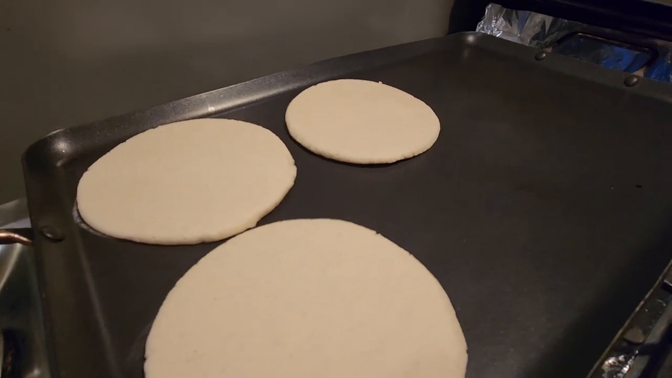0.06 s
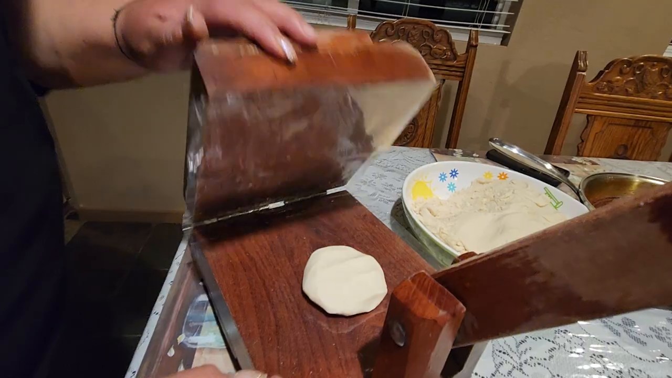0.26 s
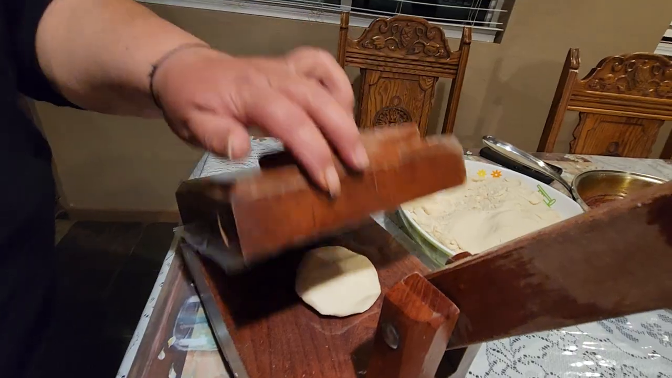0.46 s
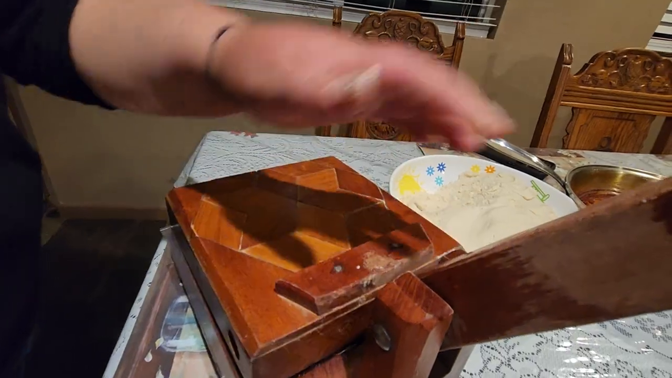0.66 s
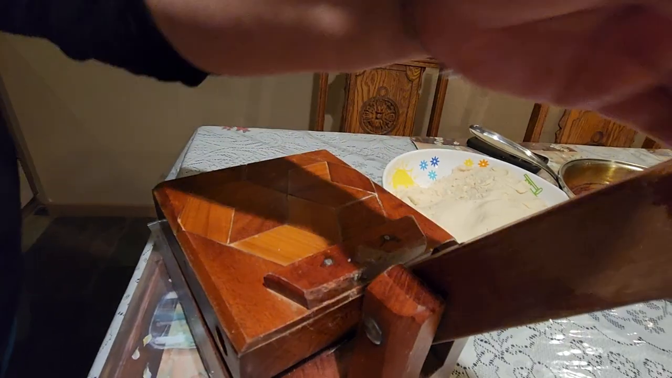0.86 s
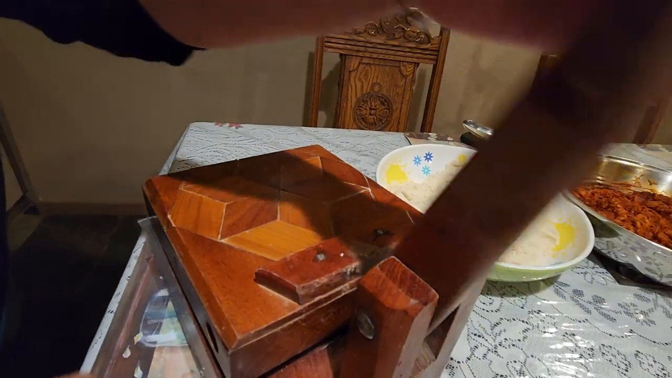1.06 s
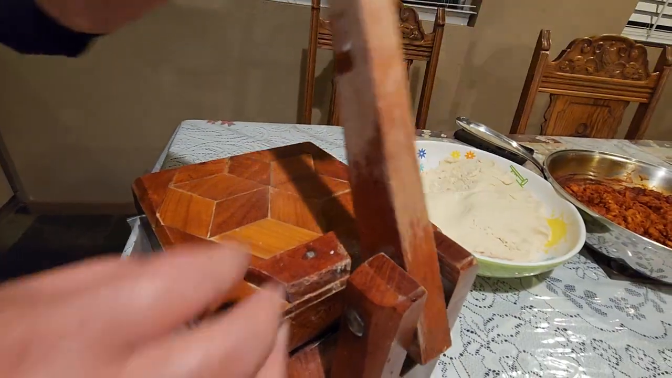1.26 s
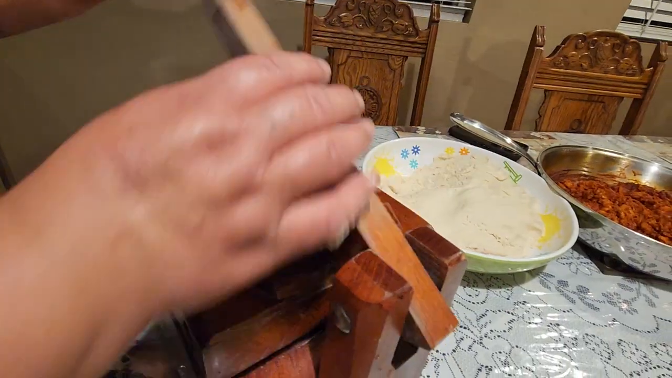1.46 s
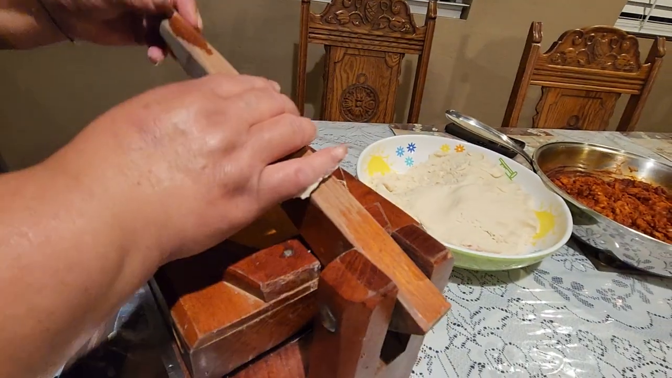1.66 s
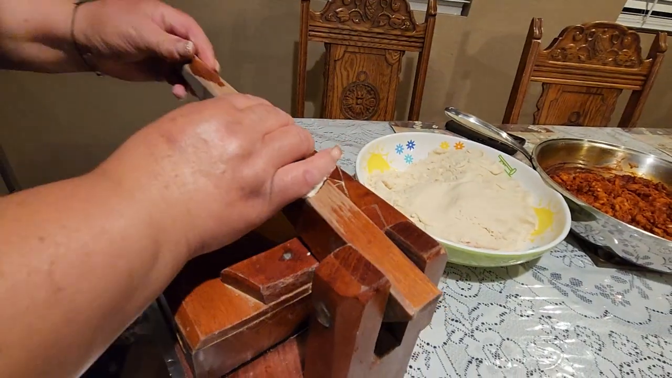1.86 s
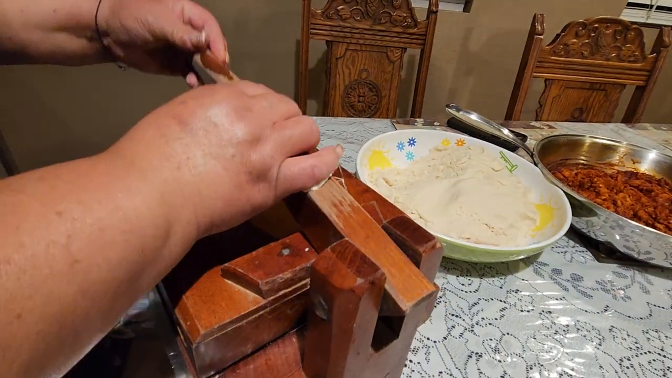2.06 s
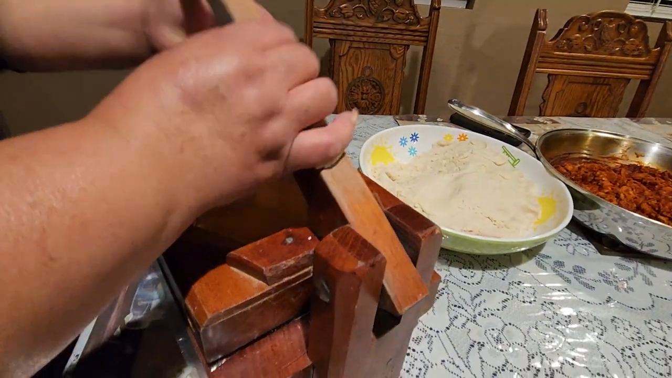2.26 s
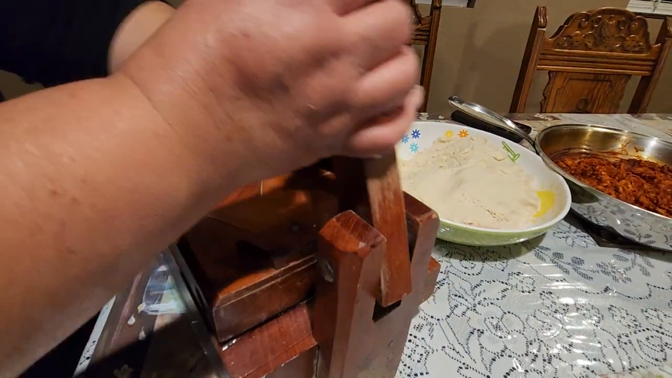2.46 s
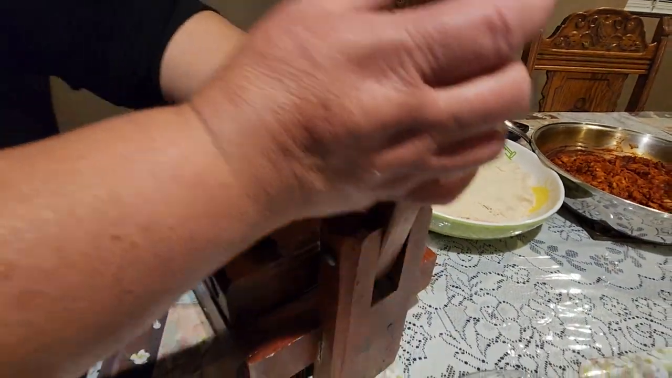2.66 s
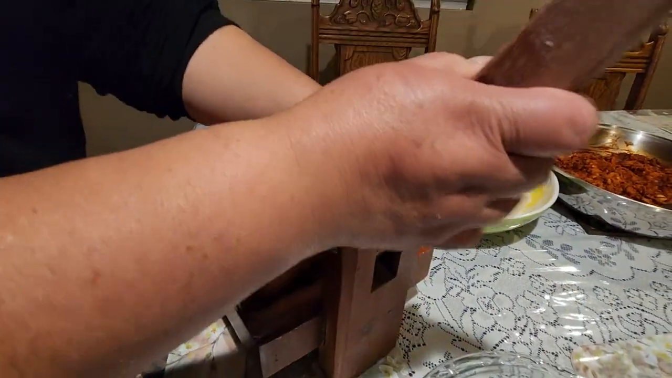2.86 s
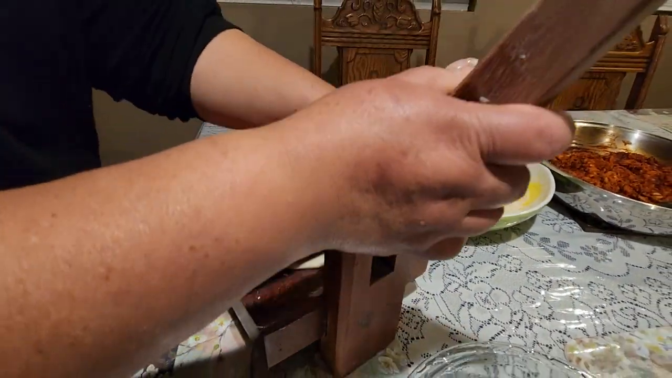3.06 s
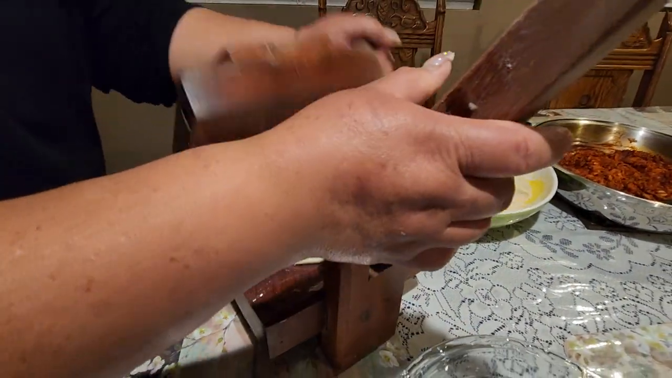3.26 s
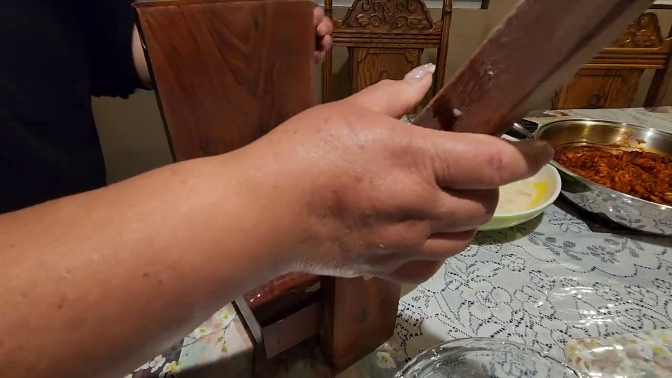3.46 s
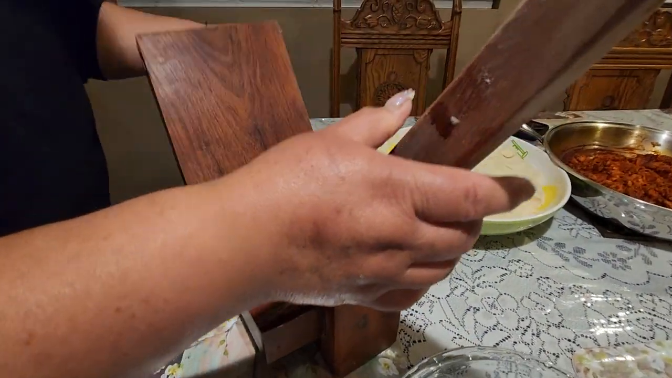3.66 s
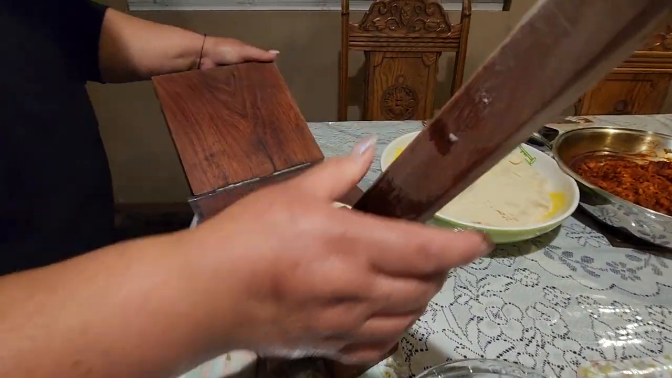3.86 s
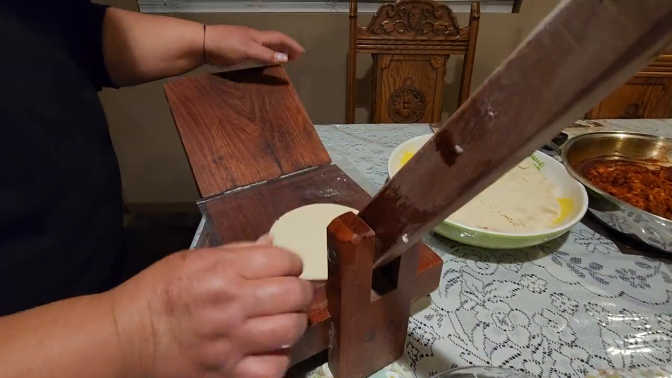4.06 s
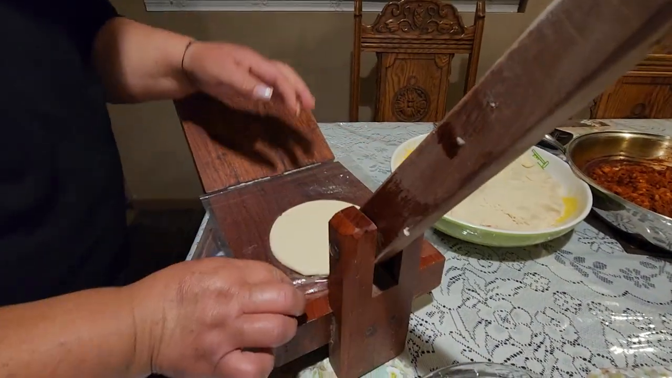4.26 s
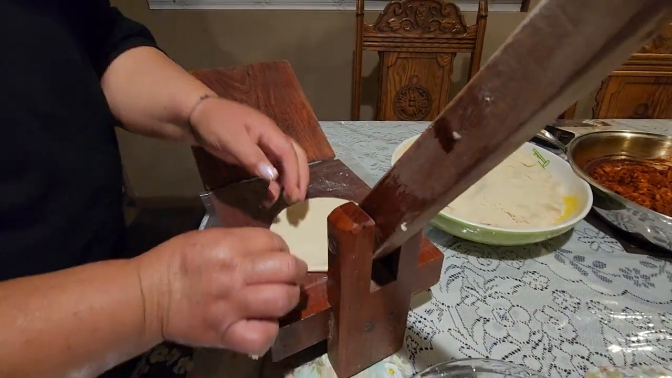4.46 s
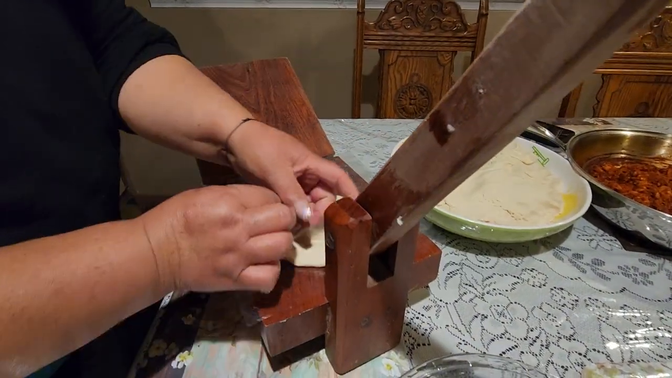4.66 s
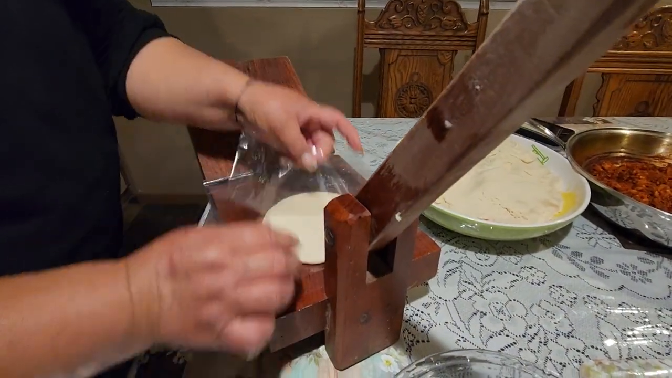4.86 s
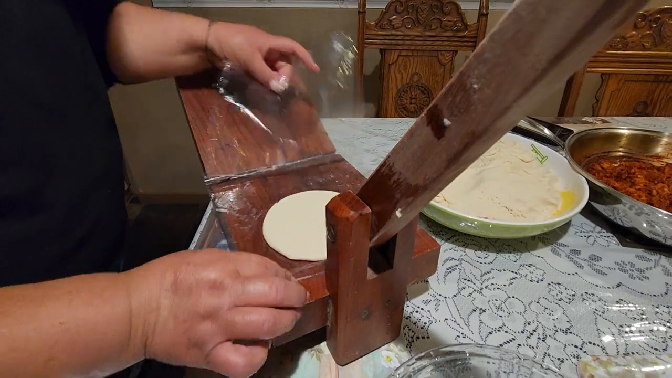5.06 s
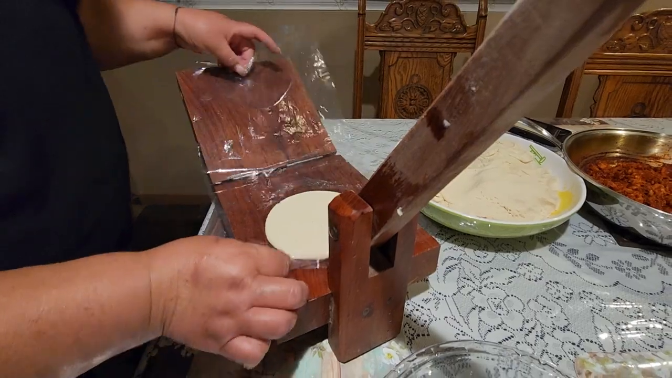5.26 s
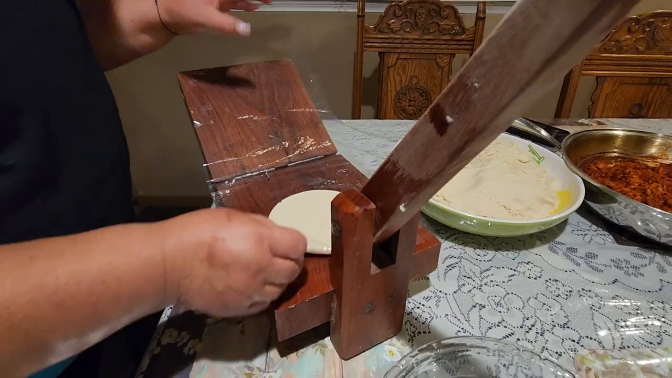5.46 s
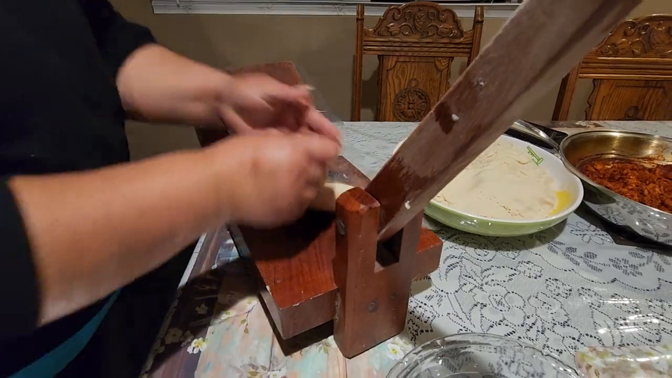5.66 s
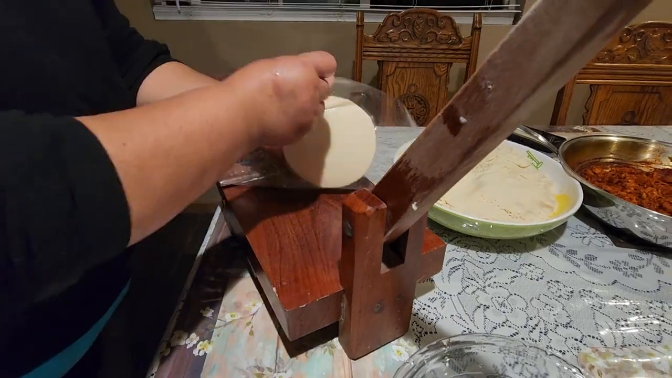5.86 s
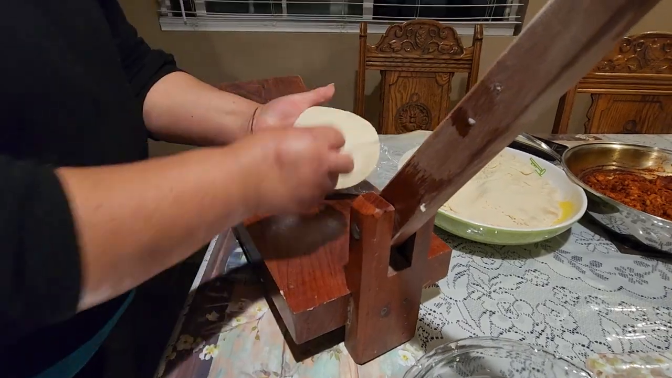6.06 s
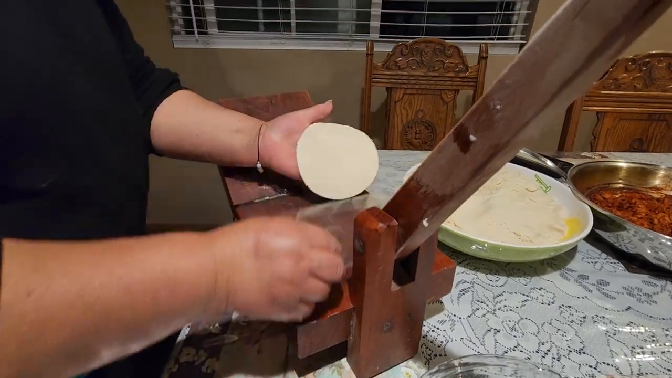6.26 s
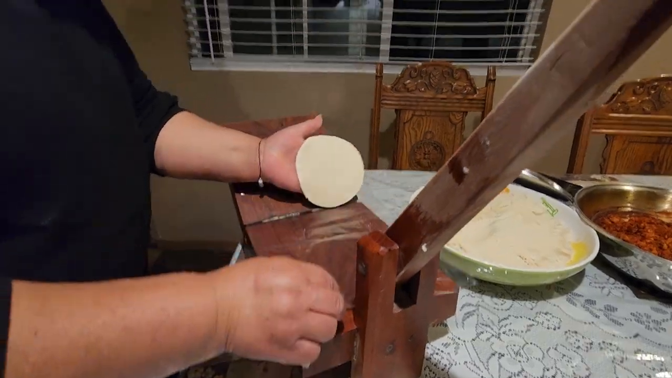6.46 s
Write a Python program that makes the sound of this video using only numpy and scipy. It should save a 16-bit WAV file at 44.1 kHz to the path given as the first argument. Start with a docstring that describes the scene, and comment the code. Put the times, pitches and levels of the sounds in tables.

```python
"""A wooden tortilla press on a cloth-covered table, heard close up in stereo: its blows are ringing modes with cracks.
The lid shuts, the loose lever knocks in its fork, a palm strokes it and the hinge squeaks as the lid falls open.
Then a thin plastic sheet is peeled off the dough: clumped clicks, dragging fingers and snapping folds.
A hot griddle, as shaped noise, hisses for the first 0.3 s; a quiet dining room and a motor hum lie below."""
import sys
import numpy as np
from scipy import signal
from scipy.fft import rfft, irfft, next_fast_len
from scipy.io import wavfile

SR = 44100
rng = np.random.default_rng(int(sys.argv[2]) if len(sys.argv) > 2 else 0)


def store_wav(level_fs):
    """Save 16-bit WAV to argv[1]."""
    pcm = np.round(np.clip(np.atleast_2d(level_fs), -1, 1) * 32767)
    wavfile.write(sys.argv[1], SR, pcm.T.astype(np.int16))


N = 286826

# Ringing modes of the lever: f/Hz, relative level/dB, free t60/s
LEVER_MODES = [(2039, 1, 0.15), (2256, -9.5, 0.22), (2510, -11, 0.15), (2740, -5, 0.14), (2793, -11, 0.25),
               (3024, -18.5, 0.11), (3055, -11.5, 0.29), (3575, -9.5, 0.084), (3540, 7, 0.07),
               (3803, -7, 0.24), (4165, -6, 0.06), (4614, -7, 0.097), (5480, -7, .06), (5574, -22.5, 0.25),
               (6720, -21.5, 0.065), (7530, -20.5, 0.034)]
# Ringing modes of the press body: f/Hz, relative level/dB, t60/s
PRESS_MODES = [(373.8, 1.5, 0.09), (551.5, -8, 0.078), (695.7, -11, 0.14), (802, 0.5, 0.048),
               (857, -6.5, 0.018), (1075, 1, 0.031), (1157, 0, 0.042), (1385, 2.5, 0.03),
               (1594, -10, 0.081), (1980, -7, 0.015)]
# Ringing modes of the table: f/Hz, relative level/dB, t60/s
TABLE_MODES = [(28.6, -7.5, 0.54), (37.2, -10, 0.28), (67, -2, 0.23), (84.5, -14.5, 0.23),
               (126.2, -1.5, 0.22), (149.1, -9, 0.32), (202, -14.5, 0.15), (275.8, -10, 0.36),
               (322, 3.5, 0.14)]
# Blows of lid, lever and table: t/s, lever low-mode level/dB, lever high-mode level/dB,
# share of free ring left by the grip/0-1, press level/dB, press favoured f/Hz, table level/dB,
# table favoured f/Hz, crack level/dB, dull shudder level/dB, bright shudder level/dB, left over right/dB
BLOWS = [(0.3027, -51, -43, 0.18, -58.5, 373, -44.5, 38, -52, -60, -63, 2),
         (0.5341, -47, -42.5, 0.16, -51, 1350, -67, 223, -37, -44.5, -46.5, 3.5),
         (0.5527, -56, -40.5, 0.03, -76.5, 390, -61, 270, -55, -60.5, -55.5, 10.5),
         (0.6012, -37.5, -21, 0.02, -35, 1100, -29, 46.2, -30.5, -36, -35.5, 6),
         (0.6148, -55, -41, 0.3, -46, 875, -24.5, 77.9, -44, -22, -39.5, 1),
         (0.627, -40, -38.5, 0.2, -28, 746, -14, 38.6, -44, -18.5, -38.5, -0.5),
         (0.9765, -34, -27, 0.34, -22, 1200, -33.5, 308.7, -33.5, -40, -43, 7),
         (.9839, -7, -11, 0.14, -25, 1180, -35, 124, -30, -40, -36.5, 2),
         (1.035, -18, -21.5, 0.05, -27, 902, -30, 118, -18.5, -48, -36.5, 5.5),
         (1.0476, -25.5, -34.5, 0.39, -34, 1174, -45, 128, -39.5, -42.5, -37, 4.5),
         (1.1462, -18, -20, 0.28, -24.5, 994, -30.5, 153.4, -35.5, -41, -60, 2.5),
         (1.1984, -43, -43, 0.05, -43, 1650, -41, 139.3, -54, -39.5, -47, 9),
         (1.2548, -24, -42.5, 0.26, -20.5, 964, -34.5, 124, -21.5, -49, -46.5, 0),
         (1.2772, -45.5, -53, .2, -38.5, 878, -42.5, 118, -38.5, -46, -45, -8.5),
         (1.519, -42, -29, .36, -28.5, 981, -34, 85, -45, -22, -28.5, 4.5),
         (1.5388, -53, -74, .16, -35.5, 650, -22, 62.5, -50, -43, -64, 6),
         (1.6378, -67, -55, .15, -47, 350, -33, 60.1, -56, -59, -70, 3),
         (2.0651, -26, -36.5, 0.11, -36.5, 1720, -37.5, 135, -72, -44, -35, 11.5),
         (2.15, -41, -45, 0.37, -34, 541, -40, 140.4, -42.5, -39, -43.5, 1.5),
         (2.358, -56, -51.5, 0.07, -62, 428, -53, 38.6, -39, -61, -56, 0),
         (2.5439, -55, -51, 0.3, -40.5, 377, -39.5, 151, -57, -35, -49.5, 4.5),
         (2.6002, -56, -59.5, 1, -44, 352, -32, 150, -57, -26, -51.5, 3.5),
         (2.648, -12.5, -16.5, 0.66, -27, 798, -27, 156.7, -37.5, -34, -30, 6),
         (2.777, -30, -37, 0.21, -35, 353, -34, 318, -60, -29.5, -30, 6),
         (2.7921, -25.5, -41, 0.17, -29, 1480, -27.5, 110, -58, -29, -53, 5.5),
         (2.8893, -34.5, -41.5, 0.1, -38.5, 1030, -28.5, 27, -48, -58, -43.5, 6),
         (3.57, -73, -46.5, 0.14, -76, 1440, -48.5, 31.8, -50, -74, -70, 0),
         (3.7335, -60, -37.5, .24, -43, 454, -46, 115, -41, -44, -55, -1),
         (3.8076, -41, -42, 0.04, -31, 467, -29, 142, -60, -21.5, -71, 0),
         (3.849, -48, -54, 0.08, -53, 390, -21.5, 43.5, -66, -66, -47.5, 0)]
# Palm strokes along the lever: start t/s, length t/s, wood whisper level/dB, skin hiss level/dB
PALM_STROKES = [(2.953, 0.38, -46, -80), (3.875, 0.31, -49, -63)]
# Stick-slip squeaks, the hinge and then a finger on the film, each a curve: t/s, f/Hz, level/dB
SQUEAKS = [
    [(3.545, 1300, -73), (3.57, 1456, -54), (3.6, 1396, -57), (3.62, 1385, -48.5), (3.645, 1270, -59.5),
     (3.69, 1360, -79)],
    [(5.19, 1213, -70), (5.21, 1213, -50.5), (5.23, 1170, -71), (5.3, 1222, -62), (5.32, 1210, -76)],
]
# Overtones of each squeak against its fundamental: second level/dB, third level/dB
SQUEAK_OVERTONES = [(0, -13), (-21, -19)]
# Rustles of the plastic lining, stirred by lid and lever, and shudder tails: t/s, crinkle level/dB,
# crinkle top level/dB, rough mid-range shudder tail after the blows level/dB, t60/s
STIRS = [(0.298, -77, -87, -68.5, 0.48), (.57, -64.5, -77, -82.5, 0.54), (.605, -54.5, -57, -81, 0.17),
         (0.628, -56.5, -72.5, -43, 0.38), (1.04, -64.5, -57, -58, 0.77), (1.17, -67, -63.5, -48, 0.45),
         (1.248, -47, -55, -62, 0.35), (1.3, -68, -64, -72, 0.14), (1.55, -72, -91, -71, 0.51),
         (2.359, -69, -76, -75.5, 0.75), (2.559, -63.5, -85, -64, 1), (2.66, -71.5, -82.5, -42.5, 0.47),
         (2.78, -78, -86, -50, 0.15), (3.049, -77, -85, -69, 1), (3.628, -57, -84, -83, 0.48),
         (3.739, -72.5, -87, -59, 1.0)]
# Peeling curve: t/s, crinkle level/dB, crinkle top level/dB, fingers dragging over film and wood level/dB
PEEL = [(4.22, -70, -91, -85), (4.3, -59, -80, -70), (4.37, -58, -49.5, -72), (4.42, -57, -76, -60.5),
        (4.48, -57.5, -58.5, -65), (4.53, -72, -84, -80), (4.6, -60, -58.5, -58), (4.66, -68, -64, -74),
        (4.73, -48, -51, -47.5), (4.82, -56.5, -58, -58), (4.92, -55, -56.5, -61.5), (5.0, -54.5, -62, -49),
        (5.11, -53, -59, -56.5), (5.2, -65.5, -70, -63.5), (5.3, -63, -76, -75), (5.34, -56.5, -62, -64),
        (5.44, -49.5, -53.5, -54), (5.515, -67, -76, -70), (5.545, -51, -64, -48), (5.645, -56, -57, -56.5),
        (5.675, -51, -60, -47.5), (5.73, -61, -70, -47), (5.87, -53, -59, -45), (5.94, -62.5, -70, -59.5),
        (6.0, -56, -61, -54), (6.14, -53.5, -57.5, -56.5), (6.24, -56.5, -64.5, -52),
        (6.36, -62.5, -71, -63.5), (6.5, -78, -101, -68.5)]
# Single folds snapping through: t/s, level/dB, main f/Hz, low part against the rest level/dB, left over right/dB
SNAPS = [(0.5352, -55, 4310, 2, 14), (0.614, -24, 13600, 6, 5.5), (1.037, -22, 7000, 8, 4.5),
         (1.2566, -33, 5600, -1, 5), (3.6351, -53, 7490, 0.0, 13), (3.7333, -40, 5900, 5, -3),
         (4.2427, -49, 7660, 0.0, 9), (4.2908, -43, 5290, 1, 7), (4.2982, -34.5, 7900, -9, 10),
         (4.3484, -35.5, 14300, -7, 4), (4.4227, -45.5, 4200, 18, -1), (4.4708, -33, 5300, -0.5, 9.5),
         (4.5528, -43, 4390, 5.5, 11), (4.5867, -40.5, 6470, -11, 6.0), (4.6964, -38, 6230, -1, 5.5),
         (4.7361, -32, 8200, 3, 4.5), (4.7716, -42.5, 7510, 9, 12), (4.803, -36.5, 5620, -3, 9),
         (4.8361, -33, 4560, -2, 7), (4.997, -34.5, 5200, -3, 2), (5.0595, -34.5, 6200, 0.0, 7),
         (5.1515, -42, 7050, 0.0, 0), (5.2094, -45, 4840, 2, 0), (5.236, -44.5, 7900, 0.0, 5.0),
         (5.2825, -41, 7640, -9, 7.5), (5.3318, -39, 5170, -2, 5), (5.3522, -28.5, 13900, -9, 4.5),
         (5.3742, -35, 6340, 5, 2), (5.4154, -48, 4870, -4, 2.5), (5.4395, -33, 14600, 4, 1),
         (5.5326, -36, 6100, 2, 10), (5.538, -33, 7600, 10, 5.5), (5.5712, -27, 4800, 7.5, 3),
         (5.5853, -27.5, 7500, 9.5, 4), (5.59, -35, 8570, 8, 6.5), (5.6022, -27.5, 13300, 3, 4),
         (5.7041, -38, 5420, 2, 8), (5.7299, -36.5, 4400, -3, 4.0), (5.8222, -38, 5550, 11, 4),
         (5.8374, -30, 5430, 2, 5.5), (5.9818, -37, 14500, 4.5, 14.5), (6.0003, -34, 15000, -1, 10),
         (6.0292, -35, 5070, -3, 4), (6.09, -44, 6260, -5, 8), (6.109, -42, 7340, 3, 11),
         (6.1262, -33.5, 5500, 4, 7), (6.236, -43.5, 5890, 7, 5)]
# Spectrum of the creases: f/Hz, relative level per Hz/dB
CRINKLE_SPECTRUM = [(1470, -29.5), (2500, -10.5), (3740, -9.5), (6810, -12), (7610, -2.5), (10900, -9),
                    (14900, -2), (15900, -8), (16150, -33.5)]
# Spectrum of the rough mid-range, both shudder tails and dragging fingers: f/Hz, relative level per Hz/dB
ROUGH_SPECTRUM = [(200, -28.5), (350, -5), (600, -4.5), (860, -10), (1100, -4), (1320, 1.5), (1460, -3),
                  (1700, -1.5), (2700, -5.5), (5000, -16), (6500, -41), (11000, -120)]
# Spectrum of the griddle hiss: f/Hz, relative level per Hz/dB
GRIDDLE_SPECTRUM = [(710, -42), (1200, -8), (1280, -5), (1670, -1), (1940, -37), (2050, -9), (2820, 8.5),
                    (3080, -23), (3880, 4), (4240, -10.5), (7330, -1), (8640, -8), (15100, -11),
                    (16000, -21), (16500, -41)]
# Spectrum of the room tone: f/Hz, relative level per Hz/dB
HUSH_SPECTRUM = [(12, -26), (20, 5.5), (62, -4), (206, -3.5), (416, -9), (566, -16), (670, -13),
                 (729, -18.5), (1240, -25), (1560, -25.5), (2890, -20), (3330, -26), (7300, -34.5),
                 (10500, -43.5), (15700, -43.5), (16100, -68.5)]
# How alike left and right are in the room: f/Hz, likeness/0-1
LIKENESS = [(60, 0.95), (150, 0.95), (380, .75), (950, 0.059), (2400, 0.27), (15000, 0)]
# Reverberation time: f/Hz, t60/s
ROOM_T60 = [(100, .6), (500, 0.3), (2000, 0.56), (6000, 0.19), (14000, 0.17)]
# Reverberation strength: f/Hz, level/dB
ROOM_LEVEL = [(100, -9.5), (500, -6), (2000, -13), (6000, -3.5), (14000, -9)]

CHATTER_S, CRACK_HZ, CRACK_OCTAVES = 0.003, 3830, 1  # shared by all blows; octaves reach to either side
RATTLE_DEPTH = 0.8  # roughness from the loose joints
LEVER_SPLIT_HZ = 3300  # parts the low lever modes from the high ones
LEVER_BACK_S, LEVER_BACK_TUNING = 2.3, 1.04  # swung back, the lever sits otherwise: its lowest mode rises
PORT_SPREAD_HZ = 5200  # phase offset between the two microphone ports grows up to this pitch
PORT_LAG = 6  # samples by which the right port hears all sounds at the table later
SKIN_HZ = 7410
STIR_ATTACK_S, SHEET_PAN_DB, SHEET_WANDER_DB = 0.0069, 4, 1
GRIDDLE_DB, GRIDDLE_END_S = -64.5, 0.298
HUSH_DB, HUSH_STEADY_HZ = -60.5, 250.7  # room tone is steadier above this pitch
HUSH_BY_GRIDDLE_DB = 4.5  # bass lift while the griddle is heard
HUM_HZ, HUM_DB = 124.6, -70.5
STOPBAND_HZ = 16700


def press():
    """Each blow is a short uneven chatter that rings lever, press and table, cracks, and leaves all shuddering."""
    size, crack_size = 16384, 1024  # samples
    out = np.zeros((2, N + size))
    t = np.arange(size) / SR
    wood_t = t[:size // 2]
    is_high = np.array(LEVER_MODES)[:, :1] > LEVER_SPLIT_HZ
    noises = rng.standard_normal((len(BLOWS), 2, size))
    chances = rng.standard_normal((len(BLOWS), 3, 4, 16))
    crack_t = t[:crack_size]
    crack_fade = np.exp(-crack_t / CHATTER_S) * (1 - np.exp(-crack_t / 0.0025))
    crack_low, crack_high = CRACK_HZ / 2 ** CRACK_OCTAVES, CRACK_HZ * 2 ** CRACK_OCTAVES
    for row, noise, (lever_luck, press_luck, table_luck) in zip(BLOWS, noises, chances):
        (s, low_db, high_db, free, press_db, press_hz, table_db, table_hz,
         crack_db, dull_db, bright_db, pan_db) = row
        lever_db = np.where(is_high, high_db, low_db)
        wood = ring(lever_modes(s), lever_db, lever_luck, wood_t, 0.6 * CHATTER_S, free=free, scatter=0.0065)
        body_db = press_db + favour(PRESS_MODES, press_hz, 1.0)
        wood += ring(PRESS_MODES, body_db, press_luck, wood_t, 0.815 * CHATTER_S, scatter=0.015)
        top_db = table_db + favour(TABLE_MODES, table_hz, 0.93)
        table = ring(TABLE_MODES, top_db, table_luck, t, 1.5 * CHATTER_S, scatter=0.082)
        # loose joints roughen the ring more and more over its first 15 ms
        roughness = rms_one(band(noise[1, :size // 2], 30, 500))
        rattle = 1 + RATTLE_DEPTH * np.clip(wood_t / 0.015, 0, 1) * roughness
        rattle *= np.cos(np.pi / 2 * wood_t / wood_t[-1])  # lets the wood end in silence
        pair = widened(noise, 0.5)
        crack = amp(crack_db) * band(pair[:, :crack_size] * crack_fade, crack_low, crack_high)
        # loose boards, cloth and bowls shudder on, the lows for longer
        dull = amp(dull_db - 60 * t / 0.31) * band(widened(noise, 0.8), 140, 830)
        bright = amp(bright_db - 60 * t / 0.25) * band(pair, 1200, 2600)
        start, gains = round(s * SR), panned(pan_db)[:, None]
        out[:, start:start + size // 2] += gains * wood * rattle
        out[:, start:start + size] += table  # unpanned: the bass reaches both ports at the same level
        out[:, start:start + size] += (dull + gains * bright) * np.clip(t / 0.01, 0, 1)
        out[:, start:start + crack_size] += gains * crack
    return out[:, :N]


def ring(modes, extra_db, luck, t, spread_s, free=1, scatter=0.01):
    """Uneven contact starts every decaying mode at its own moment, pitch, strength and stereo phase."""
    hz, db, t60 = np.transpose(modes)[:, :, None]
    pitch, strength, phase, moment = luck[:, :len(modes), None]
    hz = hz * (1 + scatter * pitch)
    age = np.maximum(t - spread_s * np.abs(moment), 0)
    rise = 1 - np.exp(-age / (0.27 * spread_s + 1e-4))
    decay_db = 60 * age / (t60 * max(free, 0.05))
    envelope = rise * amp(db + extra_db + 3 * strength - decay_db)
    turn = 0.5 * phase * np.minimum(hz / PORT_SPREAD_HZ, 1)
    return np.array([np.sum(envelope * np.sin(2 * np.pi * hz * age + side * turn), axis=0) for side in (0, 1)])


def lever_modes(s):
    """The lever's modes as it sits at time s, the lowest one retuned once it is swung back."""
    (hz, db, t60), *rest = LEVER_MODES
    tuning = LEVER_BACK_TUNING if s > LEVER_BACK_S else 1
    return [(hz * tuning, db, t60), *rest]


def favour(modes, centre_hz, octaves):
    """dB change, ever lower for modes away from the pitch that the strike point favours."""
    distance = np.log2(np.array(modes)[:, :1] / centre_hz) / octaves
    return -6 * distance ** 2


def slide():
    """Palm friction keeps the four lowest lever modes whispering and hisses thinly; each stroke swells and fades."""
    t = np.arange(N) / SR
    wood, skin = np.zeros((2, N))
    for s, length, wood_db, skin_db in PALM_STROKES:
        arch = np.sin(np.pi * np.clip((t - s) / length, 0, 1)).clip(0)
        swell = np.sqrt(arch) * (t < s + length)
        wood += amp(wood_db) * swell
        skin += amp(skin_db) * swell
    rub = rng.standard_normal(N) * amp(2.5 * drift(15))
    lowest = lever_modes(PALM_STROKES[0][0])[:4]
    whisper = sum(amp(db) * band(rub * wood, hz * 0.97, hz * 1.03) for hz, db, t60 in lowest)
    hiss = band(rub * skin, SKIN_HZ * 0.97, SKIN_HZ * 1.03)
    return (whisper + hiss) * np.ones((2, 1))


def squeaks():
    """Stick-slip: a wavering tone with two overtones, catching unevenly."""
    t, out = np.arange(N) / SR, 0
    for rows, overtones in zip(SQUEAKS, SQUEAK_OVERTONES):
        hz, level_db = in_time(rows)
        fade_in = np.clip((t - rows[0][0]) / 0.0043, 0, 1)
        fade_out = np.clip((rows[-1][0] - t) / 0.01, 0, 1)
        phase = 2 * np.pi * np.cumsum(hz * (1 + 0.018 * drift(86.5))) / SR
        tone = 0
        for k, db in enumerate((0, *overtones)):
            catching_db = (3.5 + 2.0 * k) * drift(67)  # higher partials catch more unevenly
            tone = tone + amp(level_db + db + catching_db) * np.sin((k + 1) * phase)
        out = out + fade_in * fade_out * tone
    return np.outer(panned(6.0), out)


def sheet():
    """Clumped tiny creases of film, a rough mid-range of shudder tails and then fingers, and snapping folds."""
    crinkle_gain, top_gain, rough_gain = handling()
    clicks = grains(5000 * amp(6 * drift(40)), spread_db=3.0)
    creases = coloured(clicks, CRINKLE_SPECTRUM, alike=0.13)
    crinkle = crinkle_gain * rms_one(band(creases, 1400, 6700))
    top = top_gain * rms_one(band(creases, 7000, 13000))
    rough_clicks = grains(6000 * amp(6 * drift(25)), spread_db=5.0)
    rough = rough_gain * coloured(rough_clicks, ROUGH_SPECTRUM, alike=0.62)
    out = panned(SHEET_PAN_DB + SHEET_WANDER_DB * drift(12)) * (crinkle + top + rough)
    add_snaps(out)
    return out


def add_snaps(out):
    """A fold flips through at once: a millisecond noise burst in a broad, a main and a low band."""
    size = 512
    t = np.arange(size) / SR
    fade = np.exp(-t / 0.0015) * np.clip(t / 0.0004, 0, 1)
    noises = rng.standard_normal((len(SNAPS), 2, size))
    for (s, db, hz, low_db, pan_db), noise in zip(SNAPS, noises):
        burst = widened(noise, 0.5) * fade
        snap = 0.87 * band(burst, 2630, 14800)
        snap += band(burst, hz / 1.42, hz * 1.19)
        snap += amp(low_db) * band(burst, 1230, 3240)
        start = round(s * SR)
        out[:, start:start + size] += amp(db) * panned(pan_db)[:, None] * snap


def handling():
    """Gains of crinkle, its top and the rough part: each stir swells and dies away, and peeling adds its curve."""
    t = np.arange(N) / SR
    gains = amp(in_time(PEEL)) * np.clip((t - PEEL[0][0]) / STIR_ATTACK_S, 0, 1)
    for s, *levels_db, t60 in STIRS:
        age = np.maximum(t - s, 0)
        swell = np.clip(age / STIR_ATTACK_S, 0, 1) * amp(-60 * age / t60)
        gains += np.outer(amp(levels_db), swell)
    return gains


def grains(per_s, spread_db):
    """Two streams of random clicks with a long tail of sizes."""
    size_steps = np.minimum(rng.exponential(1, (2, N)), 5)
    sizes = amp(spread_db * size_steps) * rng.choice([-1, 1], (2, N))
    return sizes * (rng.random((2, N)) < per_s / SR)


def griddle():
    """Steam hisses faintly under the dough: shaped noise with a flickering level."""
    hiss = coloured(rng.standard_normal((2, N)), GRIDDLE_SPECTRUM)
    return griddle_gate() * amp(GRIDDLE_DB + 1.5 * drift(6)) * hiss


def griddle_gate():
    """1 while the griddle is heard, then a quick fade to 0."""
    return np.clip((GRIDDLE_END_S - np.arange(N) / SR) / 0.0034, 0, 1)


def hush():
    """Room tone whose bass wanders, and a motor hum made wavering by its narrow noise band."""
    hum = amp(HUM_DB) * rms_one(band(rng.standard_normal(N), HUM_HZ - 5, HUM_HZ + 5))
    tone = amp(HUSH_DB) * coloured(rng.standard_normal((2, N)), HUSH_SPECTRUM)
    treble = band(tone, HUSH_STEADY_HZ, 19000)
    bass = amp(HUSH_BY_GRIDDLE_DB * griddle_gate() + 3.0 * drift(9.5)) * (tone - treble)
    return hum + bass + amp(0.53 * drift(2)) * treble


def room(x):
    """Reverberation: octave bands of noise, each dying at its own pace."""
    t, tail = np.arange(int(0.7 * SR)) / SR, 0
    for low in 45 * 2. ** np.arange(9):
        hz = low * np.sqrt(2)  # centre of the octave
        alike = np.clip(at_hz(LIKENESS, hz), 0, 1)
        mid, side = band(rng.standard_normal((2, len(t))), low, 2 * low)
        decay = amp(-60 * t / at_hz(ROOM_T60, hz)) * np.clip(t / 0.0041, 0, 1)
        pair = np.sqrt(1 + alike) * mid + np.sqrt(1 - alike) * side * [[1], [-1]]
        tail = tail + amp(at_hz(ROOM_LEVEL, hz)) * pair * decay / np.sqrt(2 * np.sum(decay ** 2))
    return signal.fftconvolve(x.mean(axis=0)[None], tail, axes=1)[:, :N]


def coloured(x, spectrum, alike=None):
    """Stereo from (mid, side), shaped to a spectrum and mixed by a likeness, by default the room's; rms 1."""
    size = next_fast_len(x.shape[1])
    hz = np.maximum(np.fft.rfftfreq(size, 1 / SR), 10)
    alike = np.clip(at_hz(LIKENESS, hz) if alike is None else alike, -0.9, 0.99)
    mid, side = rfft(x, size) * amp(at_hz(spectrum, hz))
    mid, side = mid * np.sqrt(1 + alike), side * np.sqrt(1 - alike)
    return rms_one(irfft(np.array([mid + side, mid - side]), size)[:, :x.shape[1]])


def widened(noise, width):
    """Left and right from a common noise and a second one added in opposite polarity."""
    return noise[0] + width * np.outer([1, -1], noise[1])


def panned(db):
    """Left and right gains for a level difference, positive to the left."""
    return amp(np.multiply.outer([0.5, -0.5], db))


def band(x, low_hz, high_hz):
    """Band-pass from a second-order Butterworth design."""
    edges = [low_hz, min(high_hz, 0.45 * SR)]
    return signal.sosfilt(signal.butter(2, edges, "band", fs=SR, output="sos"), x)


def drift(rate_hz):
    """Slow random wander of rms about 1: low-passed noise, drawn every 40 samples."""
    r = np.exp(-80 * np.pi * rate_hz / SR)
    noise = rng.standard_normal(N // 40 + 2002)
    slow = signal.lfilter([1], [1, -2 * r, r * r], noise)[2000:]  # skips the filter's settling
    return np.interp(np.arange(N) / 40, np.arange(len(slow)), rms_one(slow))


def in_time(rows):
    """Curve columns at every sample; ends are held."""
    s, *columns = np.transpose(rows)
    return [np.interp(np.arange(N) / SR, s, column) for column in columns]


def at_hz(points, hz):
    """Value of a table on a log-frequency axis."""
    table_hz, values = np.array(points).T
    return np.interp(np.log(hz), np.log(table_hz), values)


def amp(db):
    """dB to gain."""
    return 10 ** (np.asarray(db) / 20)


def rms_one(x):
    """Scale to rms 1."""
    return x / np.sqrt(np.mean(x ** 2) + 1e-20)


def scene():
    """Everything at the table passes through the room; griddle and room tone are heard as they are."""
    near = press() + slide() + squeaks() + sheet()
    near[1] = np.pad(near[1], (PORT_LAG, 0))[:N]
    return near + room(near) + griddle() + hush()


def record(dry):
    """Soft saturation rounds the loudest peaks; the bottom and the top are cut."""
    dry = 0.85 * np.tanh(dry / 0.85)
    dry = signal.sosfilt(signal.butter(2, 22, "high", fs=SR, output="sos"), dry)
    return signal.sosfilt(signal.cheby2(20, 80, STOPBAND_HZ, fs=SR, output="sos"), dry)


dry = scene()
out = record(dry)
store_wav(out)
```